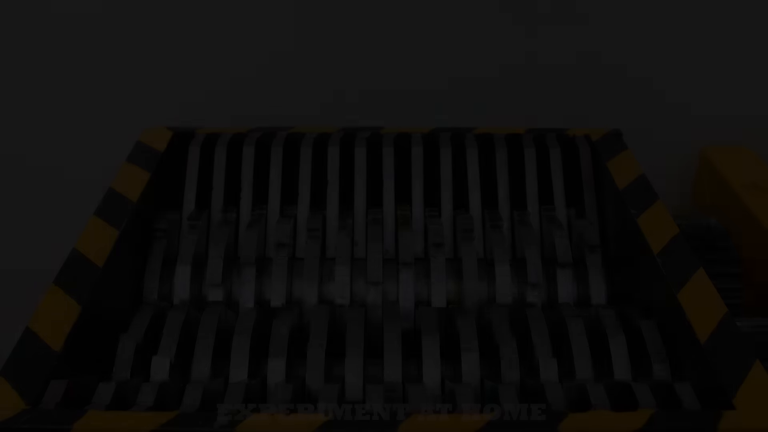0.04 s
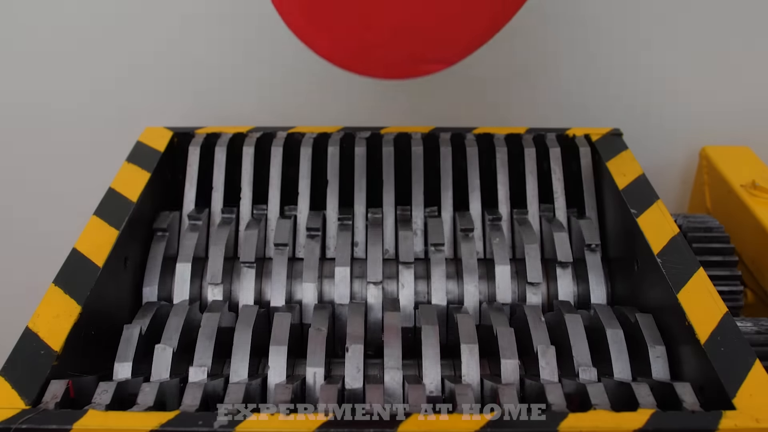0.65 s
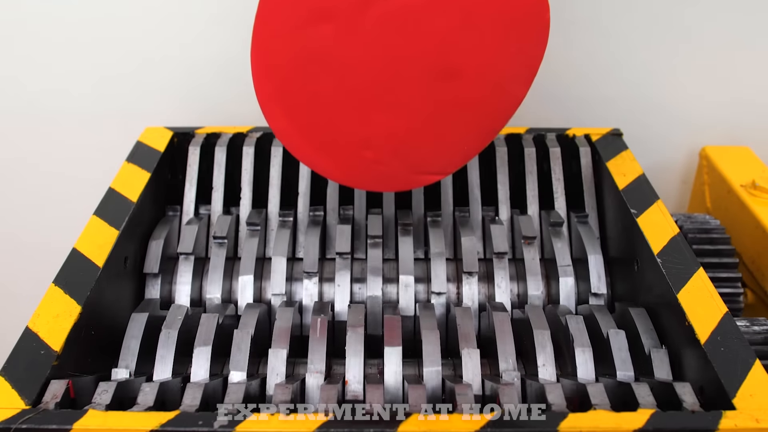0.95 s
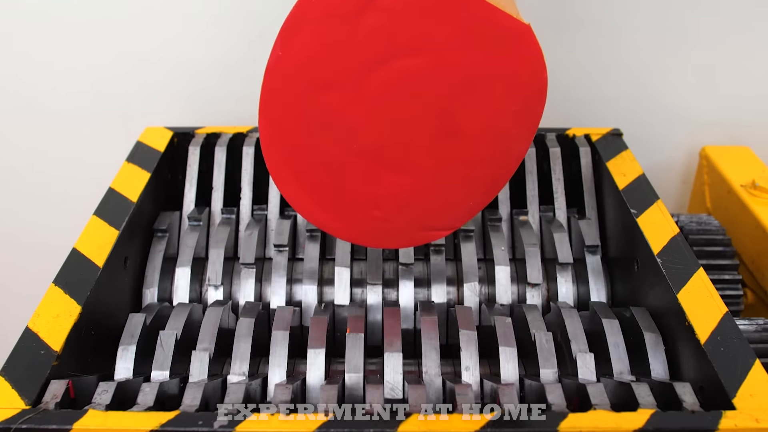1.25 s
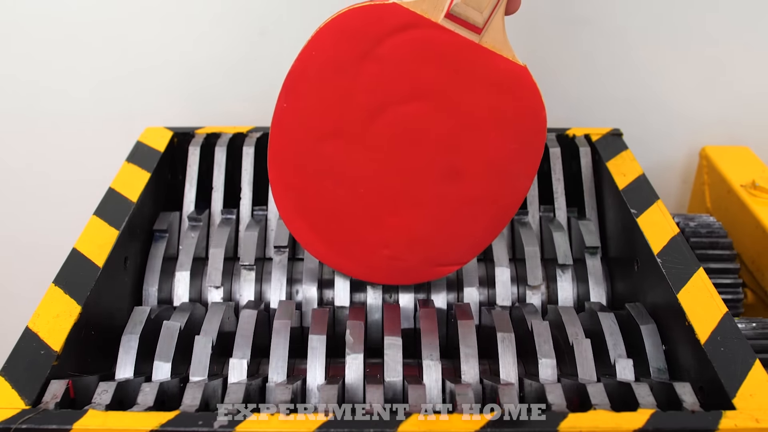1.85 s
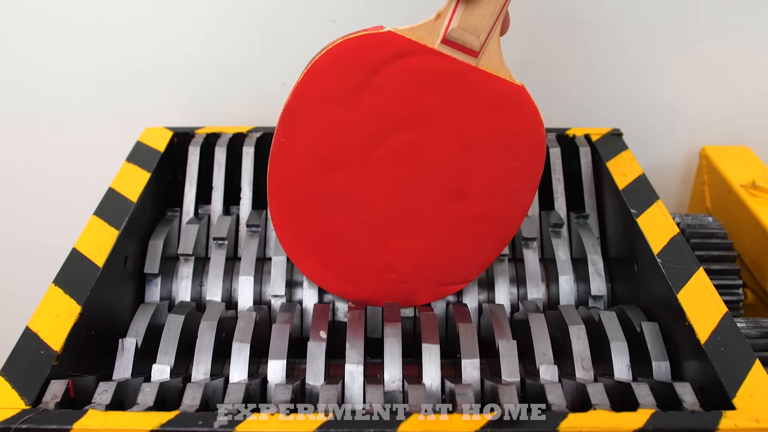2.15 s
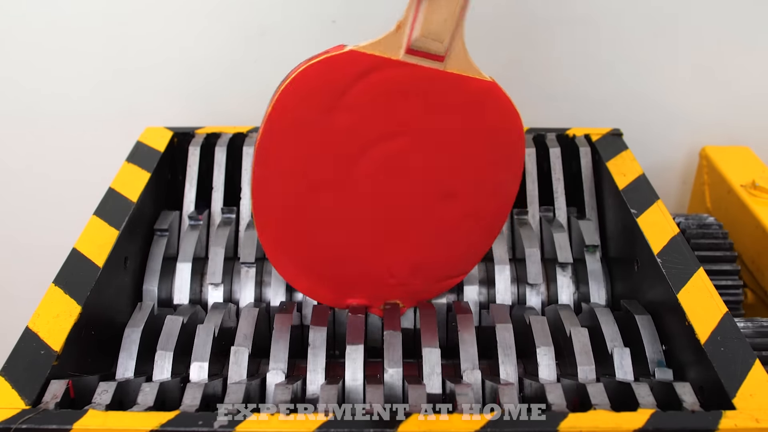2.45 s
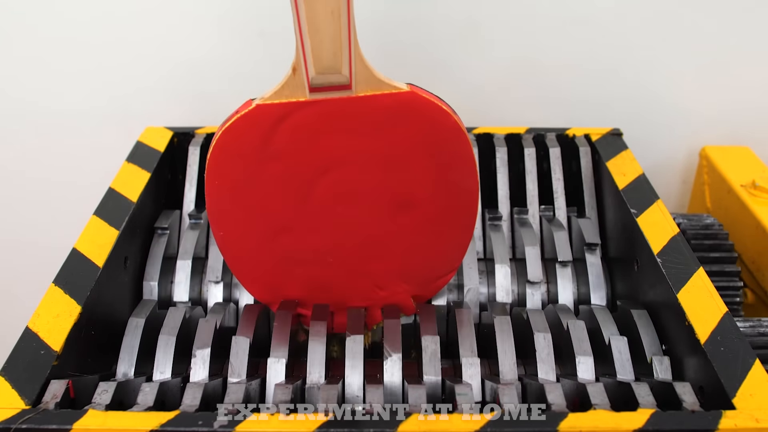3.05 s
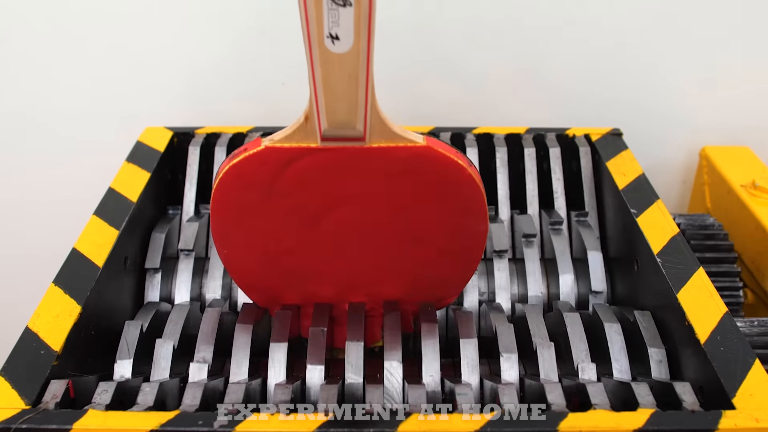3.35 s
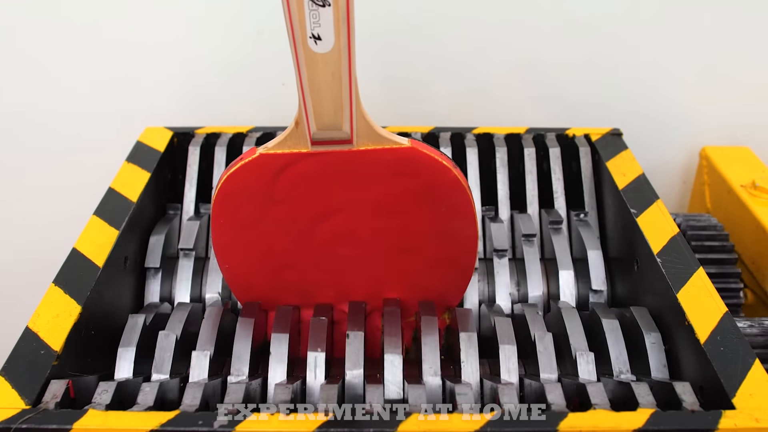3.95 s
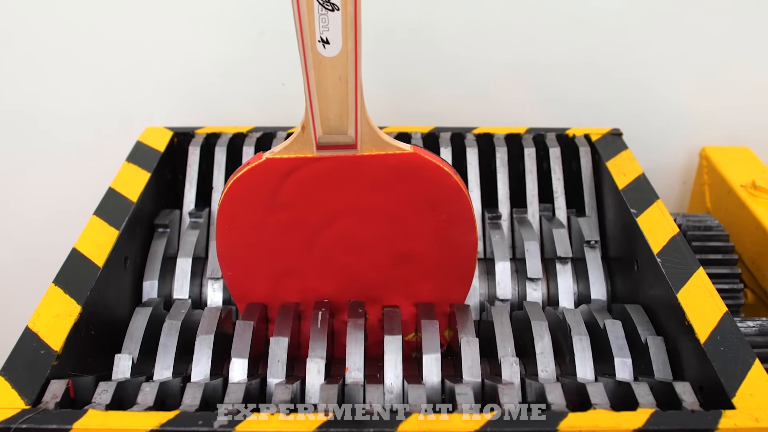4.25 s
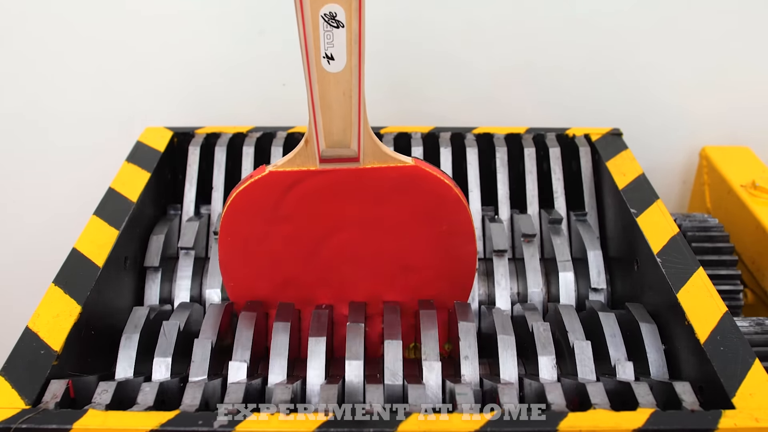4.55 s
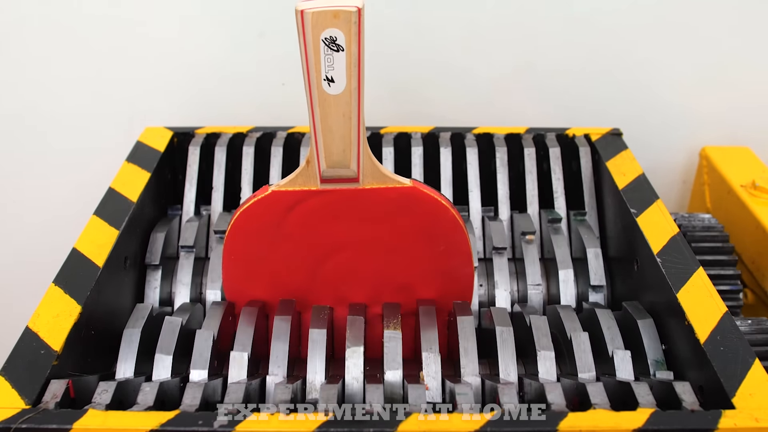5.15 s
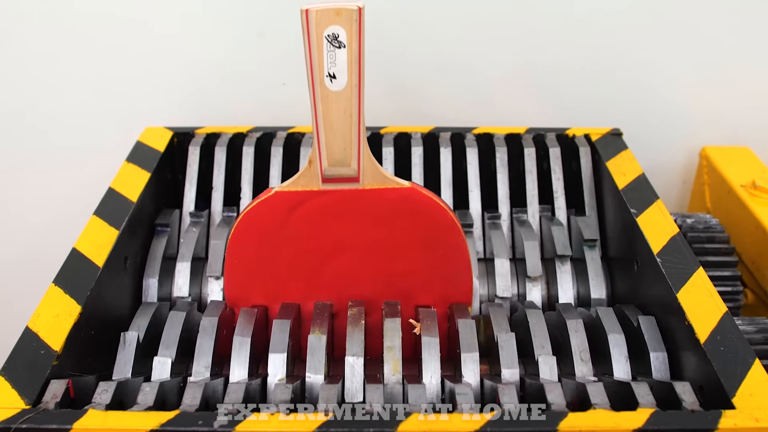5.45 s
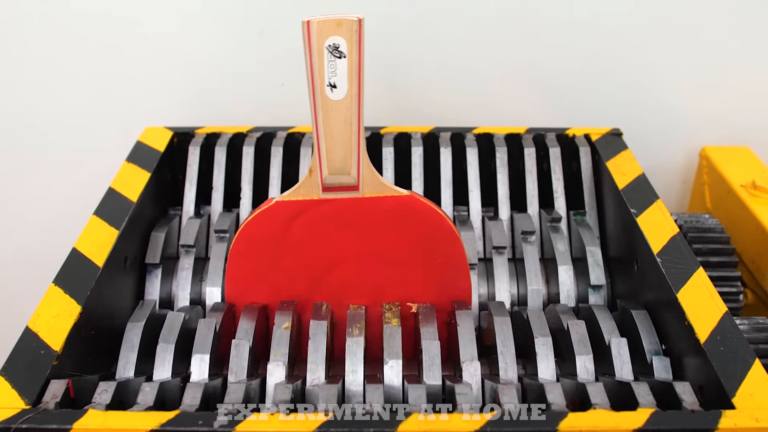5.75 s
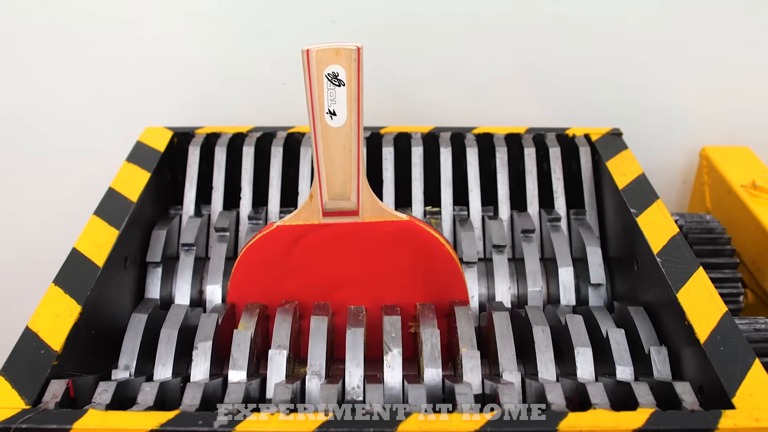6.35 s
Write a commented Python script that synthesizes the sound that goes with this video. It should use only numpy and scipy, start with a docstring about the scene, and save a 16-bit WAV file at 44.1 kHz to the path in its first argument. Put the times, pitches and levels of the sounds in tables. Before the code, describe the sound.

An idling shredder whines and knocks softly, then rumbles as it steadily crushes, snaps and splinters a plywood paddle.

```python
"""A twin-shaft shredder fades in, idling: gears and mains hum, bearings whine, the coupling knocks.
From 2.5 s its hooks catch a plywood table-tennis paddle; the motor sags and the frame rumbles.
Nine hooks a second then crush the fibres, the plies snap with sharp cracks and the paddle jolts the frame.
Towards the end the paddle's own ring climbs as it is eaten shorter."""
import sys
import numpy as np
from scipy import signal
from scipy.fft import rfft, irfft, next_fast_len
from scipy.io import wavfile
from scipy.ndimage import map_coordinates

SR = 44100
rng = np.random.default_rng(int(sys.argv[2]) if len(sys.argv) > 2 else 0)


def master_out(mix):
    """Clip the mix to full scale and print it as 16-bit PCM to the path in sys.argv[1]."""
    frames = np.transpose(np.atleast_2d(mix))
    ceiling = np.clip(frames, -1, 1)
    pcm = np.round(ceiling * 32767).astype(np.int16)
    wavfile.write(sys.argv[1], SR, pcm)


N = 344421
TIME_S = np.arange(N) / SR

# first hook ticks, then ply snaps: time_s, relative_db, treble_db, ring_re_snap_db, tear_re_click_db
PLY_SNAPS = [(2.631, -41, -24, 3, 3), (2.685, -39, -11, 12.5, 6), (2.695, -15, -6, -12.5, 3),
             (2.7189, -21, -9, -12, -1), (2.7426, -22.5, 1, -26, -1), (2.7817, -28, -7, -18, -5),
             (2.8245, -19.5, 3, -6, -3), (2.8344, -12.5, -20, -17, -4), (2.848, -21.5, -1, -21, -10),
             (3.0447, -18, -1, -24, 0), (3.0737, -13.5, -20, -31, -14), (3.081, -18.5, 1, -12, 6),
             (3.1208, -13.5, -11, -14, 5), (3.1706, -24, -11, -18, -3), (3.2096, -21.5, 3, -24, -4),
             (3.2274, -16, -17, -5, -1), (3.3424, -21, -5, -9, 2), (3.386, -23, -9, -8.5, -11),
             (3.4225, -22, -16, -19, -2), (3.437, -32, -15, -20, 0), (3.462, -17.5, -17, -31, 0),
             (3.6016, -13.5, -2, -28, 5), (3.6144, -20, 2, -21, -11), (3.7221, -17, -5.5, -29, -1),
             (3.849, -19.5, -3, -28, -2), (3.9027, -25.5, -24, -25, -8), (3.9258, -21, -13, -25, -16),
             (4.012, -17.5, 1, -23, -14), (4.0828, -18.5, -2, -25, -1), (4.1457, -29, -17, -28, 5),
             (4.2032, -20, -16, -21, 4), (4.327, -21.5, 4, -10, -8), (4.356, -20, -10, -27, 2),
             (4.4687, -27.5, -11, -6, -1), (4.641, -20, -4, -6.5, 15), (4.7228, -21, 1, -20, 2),
             (4.8155, -22, 9, -17, 3), (4.8325, -20, -1, -28, -1), (4.871, -19, 1, -19, 20),
             (4.9647, -20, -8, -10, 5), (5.0583, -15, -5, -14, -1), (5.0683, -12.5, -7, -32, 8),
             (5.087, -25, -20, -16, -9), (5.179, -15.5, -27, -8.5, 2), (5.2766, -24, -7, 3.5, 8),
             (5.296, -19, -7, -4.5, 15), (5.3004, -22, -18, -2.5, 10), (5.3713, -24.5, -15, -17, -5),
             (5.401, -14, -6, -11, -2), (5.5102, -23, -2, -5, 13), (5.5212, -28.5, -3, 2.5, 14),
             (5.6047, -29.5, -23, 4.5, 17), (5.7106, -23.5, -9, -7.5, 8), (5.8533, -23, -9, -2, 5),
             (5.8718, -23, 0, -4, -1), (5.9525, -19.0, 3, -9.5, 1), (5.9757, -20.5, 1, -6, 13),
             (6.0237, -26, -1, -8, 3), (6.072, -20.5, 1, -1.5, 8), (6.1534, -19.5, -22, -11, 0),
             (6.178, -21.5, -13, -5.5, -1), (6.232, -22, -8, -2.5, 11), (6.2463, -22.5, -26, -3.5, 7),
             (6.4944, -19.0, 0, -9, 19), (6.516, -26, 0, -5, 3), (6.6212, -21, 7.5, -7, 0),
             (6.635, -18, -11, -10.5, 7), (6.655, -19, -3, -21, -4), (6.6862, -25.5, -9, -22, 8),
             (6.7839, -19, -6, -6.5, 2), (7.0305, -14, -18, -7, -5), (7.0473, -21.5, 10, -23, 1),
             (7.0634, -23, -10, -12, 8), (7.1807, -19, -1.5, -28, 6), (7.2554, -18.5, 7, -24, 6),
             (7.2746, -19.5, -7, -9.5, 0), (7.289, -24, 6, -25, -9), (7.3066, -15.5, -3, -28, 3),
             (7.3273, -17.5, -5, -11, 9), (7.3458, -14, -8, -32, -3), (7.4337, -19.5, 5, -14, 3),
             (7.5828, -15.5, -9.5, -20.5, -1), (7.653, -21, -3.5, -27, -7), (7.676, -18.5, -8, -27, 7),
             (7.7198, -21.5, -1, 2, 0), (7.7517, -20, -26, -19, 14), (7.7677, -19.0, 3, -18, 14)]
# resistance of the wood: time_s, load_fraction
WOOD_LOAD = [(2.45, 0.039), (2.56, 0.35), (2.67, 0.45), (2.76, 0.95), (2.97, 0.76), (3.25, 0.83),
             (3.4, 0.92), (4.1, 0.93), (5.6, 0.97), (7.81, 0.95)]
# paddle drawn in by fits and starts: time_s, feed_fraction
PADDLE_FEED = [(3.24, 0.06), (3.5, 0.24), (4.2, 0.43), (5.05, 0.56), (5.18, 0.69), (5.56, 0.71), (5.8, 0.8),
               (6.4, 0.81), (6.8, 0.88), (7.3, 0.95)]


def crushing():
    """Each hook swells the crunch over a steady grind. Returns sound and force on the paddle."""
    # whole strips caving in: centre_s, level_db, duration_s
    collapses = [(2.832, -22, 0.028), (3.608, -17.5, 0.0096), (4.03, -26.5, 0.092), (4.19, -26, 0.043),
                 (4.33, -27.5, 0.077)]
    # fine splintering: frequency_hz, density_db
    fine_spectrum = [(200, -15), (700, 1.5), (1500, -7.5), (2400, 3), (3000, -1.5), (3700, 0.5),
                     (5400, 1.5), (6900, 0), (8400, 1), (9200, -1.5), (10200, -16), (13400, -5),
                     (15800, -32)]
    # thicker splinters: frequency_hz, density_db
    thick_spectrum = [(500, -3), (2000, 0), (5000, -14.5), (8500, 9.5), (10500, -6.5), (15800, -12.5)]
    load = curves(WOOD_LOAD)[0]
    bite_power = hook_bites(load, first_s=2.70, period_s=0.1086, jitter_s=0.008)
    grind_power = (load ** 2 * amp(-31)) ** 2
    grip = slack(depth=7.2, recover_s=0.043)
    crunch_power = grip ** 2 * (grind_power + bite_power) + swells(collapses)
    force_power = (load * amp(-38.5)) ** 2 + amp(-11) ** 2 * bite_power
    fine = fibres(rate_hz=2200, scatter_db=7, echo_gain=1.4, echo_s=0.0033, shift_db=2, spots=16)
    thick = fibres(rate_hz=50, scatter_db=3, echo_gain=2, echo_s=0.001, shift_db=1.5, spots=8)
    crunch = unit(colour(fine, fine_spectrum)) + amp(-4) * unit(colour(thick, thick_spectrum))
    crunch += amp(-5) * chips(rate_hz=51, centre_hz=4480, log_spread=0.34, decay_s=0.0013)
    return np.sqrt(crunch_power) * unit(crunch), np.sqrt(force_power) * unit(fine + amp(-1.5) * thick)


def hook_bites(load, first_s, period_s, jitter_s):
    """Power of hook after hook meeting the wood; bites get crisper as the paddle goes deeper."""
    hooks_s = np.arange(first_s, N / SR, period_s)
    lateness, size = rng.standard_normal((len(hooks_s), 2)).T
    feed = np.interp(hooks_s, *np.transpose(PADDLE_FEED))
    durations_s = np.interp(feed, [0, 1], [0.08, 0.048])
    return load ** 5.9 * swells(zip(hooks_s + jitter_s * lateness, -27.5 + 0.64 * size, durations_s))


def slack(depth, recover_s):
    """Crunch gain: a big snap frees the wood until the hooks grip again."""
    relief, t = np.zeros(N), np.arange(SR // 3) / SR
    for time_s, snap_db, *_ in PLY_SNAPS:
        add(relief, time_s, amp(snap_db) ** 2 * t / recover_s * np.exp(1 - t / recover_s))
    return 1 / (1 + depth * relief)


def fibres(rate_hz, scatter_db, echo_gain, echo_s, shift_db, spots):
    """Fibres of unequal size break; the work shifts between spots, each with its own short echo."""
    track, t = np.zeros(N), np.arange(SR // 100) / SR
    for _ in range(spots):
        breaks = rng.random(N) < rate_hz / spots / SR
        sizes = amp(scatter_db * np.clip(rng.standard_normal(N), -2, 2)) * rng.choice([-1, 1], N)
        echo = echo_gain * unit(rng.standard_normal(len(t)) * np.exp(-t / echo_s)) / np.sqrt(len(t))
        echo[0] += 1
        work = amp(shift_db * np.tanh(wobble(14)))
        track += signal.oaconvolve(breaks * sizes * work, echo)[:N]
    return unit(track)


def chips(rate_hz, centre_hz, log_spread, decay_s):
    """Small chips snap off, each with a tick and a brief ring at its own pitch."""
    track, t = np.zeros(N), np.arange(SR // 125) / SR
    for place, pitch, size in rng.random((round(rate_hz * N / SR), 3)):
        ring_hz = centre_hz * np.exp(log_spread * (2 * pitch - 1))
        ring = np.sin(2 * np.pi * ring_hz * t) * np.exp(-t / decay_s)
        tick = 1.05 * rng.standard_normal(len(t)) * np.exp(-2 * t / decay_s)
        add(track, place * N / SR, amp(10 * size) * (ring + tick))
    return unit(track)


def snapping(click_s, base_tear_s, tear_rise_s, lead_gain, lead_s, grain_db):
    """A few fibres give, then a ply clicks and tears on. Returns sound and force on the paddle."""
    # freed slivers ringing near a common pitch: time_s, pitch_hz, relative_db
    slivers = [(3.1, 4840, -10.5), (6.5, 4500, -18), (7.03, 4480, -10), (7.25, 5520, -5)]
    sliver_hz, sliver_db = curves(slivers)
    cracks, force = np.zeros(N), np.zeros(N)
    t = np.arange(-SR // 100, SR // 50) / SR
    burst_gain = np.sqrt(0.006 * SR / len(t))  # energy of 6 ms at unit RMS
    # the wood smears the click: highs arrive first
    remaining = np.clip(1 - t / click_s, 0, 1) * (t > 0)
    click = unit(np.sin(np.pi * 16000 * click_s * remaining ** 2))
    for time_s, snap_db, treble_db, ring_db, tear_db in PLY_SNAPS:
        tear_s = base_tear_s * amp(tear_db / 2)  # bigger tears last longer
        tearing = (1 - np.exp(-abs(t) / tear_rise_s)) * np.exp(-abs(t) / tear_s)
        giving = lead_gain * np.exp(-abs(t) / lead_s)
        strands = rng.standard_normal(len(t))
        strands *= amp(grain_db * np.repeat(rng.standard_normal(len(t)), 8)[:len(t)])
        tear = amp(tear_db) * unit(strands * np.where(t < 0, giving, tearing))
        burst = unit(click + tear)
        now = round(time_s * SR)
        pitch_hz = np.full(len(t), sliver_hz[now] * np.exp(0.02 * rng.standard_normal()))
        sliver = 0.5 * amp(sliver_db[now]) * resonate(burst, pitch_hz, width_hz=400)
        spectrum = [(300, -21), (800, -12), (1500, -1), (2400, 1), (3000, -0.5), (4000, 2.5), (5500, 1),
                    (8400, treble_db / 2 + 7.5), (10000, treble_db), (16000, treble_db - 3)]
        crack = unit(colour(burst + sliver, spectrum))
        add(cracks, time_s + t[0], amp(snap_db - 0.06) * burst_gain * crack)
        add(force, time_s + t[0], amp(snap_db + ring_db + 2) * burst_gain * unit(click + 0.5 * tear))
    return cracks, force


def paddle(force, damping, slip):
    """The blade's bending modes climb as it gets shorter and shift with the grip."""
    # modes, loudest as the hooks pass an antinode:
    # antinode_feed, antinode_hz, climb_hz_per_feed, peak_db, rise_db_per_feed, fall_db_per_feed
    bending_modes = [(0.06, 1670, 1350, 2, 12, 11), (0.78, 1705, 1590, 6, 9, 100),
                     (0.95, 1265, 4000, 0, 70, 20), (0.82, 540, 2000, 1, 38, 70),
                     (0.95, 5480, 520, -1, 44, 10)]
    # bass cut that keeps the ring light and free of thumps: frequency_hz, gain_db
    bass_cut = [(250, -25.5), (500, -9.5), (1100, -0.5), (4000, -6.5)]
    ring, feed = np.zeros(N), curves(PADDLE_FEED)[0]
    force = colour(force, bass_cut)
    for antinode, antinode_hz, climb, peak_db, rise, fall in bending_modes:
        past = feed - antinode
        pitch_hz = np.maximum(antinode_hz + climb * past, 200) * (1 + slip * wobble(45))
        gain = amp(peak_db + np.minimum(rise * past, -fall * past))
        ring += gain * resonate(force, pitch_hz, width_hz=damping * antinode_hz)
    return ring


def jolts(decay_s, rise_s):
    """Dull knocks in the frame as the paddle jumps between the hooks."""
    # paddle jumps: time_s, relative_db
    jumps = [(3.528, -32), (3.795, -33.5), (4.243, -29), (4.578, -32), (5.561, -29), (5.72, -30.5),
             (5.927, -33.5), (6.416, -33.5), (7.205, -28)]
    spectrum = [(60, -22), (150, -27), (200, -14.5), (275, 6.5), (370, -10), (750, -9.5), (4000, -72)]
    knocks, t = np.zeros(N), np.arange(SR // 5) / SR
    envelope = (1 - np.exp(-t / rise_s)) * np.exp(-t / decay_s)
    for time_s, relative_db in jumps:
        body = unit(colour(rng.standard_normal(len(t)), spectrum))
        add(knocks, time_s - rise_s, amp(relative_db + 7.5) * body * envelope)
    return knocks


def drive(mains_hz):
    """The motor and all it shakes; under load the shaft sags and runs less evenly."""
    # motor shaft: time_s, speed_hz
    shaft_speed = [(0, 24.86), (2.55, 24.86), (2.76, 24.5), (3.05, 24.78), (3.4, 24.54), (4.1, 24.63),
                   (5.1, 24.48), (5.6, 24.35), (6.9, 24.42), (7.81, 24.25)]
    load = curves(WOOD_LOAD)[0]
    shaft_hz = curves(shaft_speed)[0] * (1 + (0.0002 + 0.00386 * load) * wobble(16))
    shaft_rad = 2 * np.pi * np.cumsum(shaft_hz) / SR
    mains_rad = 2 * np.pi * mains_hz * TIME_S
    return (gear_train(shaft_rad, shaft_hz, load, teeth=38) + magnetic_hum(mains_rad, load)
            + frame(shaft_rad, mains_rad, load) + fan(level_db=-44)
            + coupling(shaft_rad, load, ring_hz=280.8, width_hz=20.7))


def gear_train(shaft_rad, shaft_hz, load, teeth):
    """Load roughens the gear tones, lowers the whine and makes the teeth growl at the mesh frequency."""
    # shaft and gear tones: shaft_multiple, unloaded_db
    gear_orders = [(5, -56), (26, -62), (29, -54), (30, -53), (33, -53.5), (34, -52.5), (37, -52.5),
                   (38, -47), (39, -51.5), (42, -45), (43, -58), (50, -57)]
    # rotor slots and bearings: shaft_multiple, relative_db
    whine_orders = [(72, -57), (80, -54.5), (81, -61), (91.2, -53.5), (95.6, -53.5), (100, -54),
                    (105.8, -43), (107, -55), (110, -57)]
    gears = amp(load * (3 + 1.65 * wobble(22))) * tones(gear_orders, shaft_rad)
    whine = amp(2 - 6.7 * np.sqrt(load)) * tones(whine_orders, shaft_rad)
    growl = unit(resonate(rng.standard_normal(N), teeth * shaft_hz, width_hz=16))
    return gears + whine + amp(-39.5) * load ** 2 * growl


def magnetic_hum(mains_rad, load):
    """The motor hums at even multiples of the mains, weaker under load."""
    # overtones: mains_multiple, unloaded_db
    harmonics = [(4, -54.5), (6, -44), (8, -52)]
    # low 100 Hz hum swelling and fading: time_s, unloaded_db
    low_hum_levels = [(.6, -50), (1.4, -50.5), (1.95, -44), (2.5, -50.5), (2.9, -43)]
    overtones = sum(np.sqrt(2) * amp(db) * np.cos(multiple * mains_rad) for multiple, db in harmonics)
    low_hum = amp(curves(low_hum_levels)[0]) * unit(np.sin(2 * mains_rad))
    return amp(-6 * load) * (overtones + low_hum)


def frame(shaft_rad, mains_rad, load):
    """The casing buzzes with each magnetic pull and each turn; the loaded frame throbs and rumbles."""
    # throb, twice a turn: time_s, full_load_db
    throb_levels = [(3.4, -49), (6.6, -55), (7.5, -54)]
    # casing buzz: frequency_hz, density_db
    buzz_spectrum = [(25, -4), (80, -11.5), (150, -1), (180, -10.5), (230, 3), (290, -2.5), (480, -7),
                     (800, -1.5), (1150, -7.5), (1330, -2), (1700, -12), (2400, -0.5), (2650, -4),
                     (3000, -31), (4000, -33)]
    # frame rumble: frequency_hz, density_db
    rumble_spectrum = [(25, -3.5), (50, -4), (72, -5.5), (110, -11.5), (150, 6.5), (185, -7), (270, 7),
                       (350, 0.5), (460, -5), (730, -3), (930, -6), (1200, -4), (2500, -21), (5000, -16)]
    throb = load * amp(curves(throb_levels)[0] + 1.4 * wobble(12)) * unit(np.sin(2 * shaft_rad))
    buzz = amp(-42.5 + 1.4 * np.sin(2 * mains_rad) + 1.6 * np.cos(shaft_rad)) * noise(buzz_spectrum)
    rumble = load * amp(-34.5 + 2.2 * wobble(18)) * noise(rumble_spectrum)
    return throb + buzz + rumble


def coupling(shaft_rad, load, ring_hz, width_hz):
    """Play in the coupling knocks once a turn and rings the casing, more unevenly under load."""
    # knocking: time_s, level_db
    knock_levels = [(.5, -55), (.85, -42.5), (1.25, -42), (1.5, -50.5), (2.6, -41), (3.5, -41)]
    knocks = np.diff(np.floor(shaft_rad / (2 * np.pi) + 0.5), prepend=0)
    force = knocks * amp((1 + 3 * load) * np.tanh(wobble(27)))
    return amp(curves(knock_levels)[0]) * unit(resonate(force, np.full(N, ring_hz), width_hz))


def fan(level_db):
    """Steady hiss of air."""
    # fan air: frequency_hz, density_db
    air_spectrum = [(1500, -8), (3000, 4), (4100, 5.5), (4400, 7), (5400, 2), (6500, 6), (7300, 3.5),
                    (8800, 7), (9400, -2), (10200, -2.5), (12000, -13.5), (14000, -8), (16000, -59)]
    return amp(level_db) * noise(air_spectrum)


def room(x, t60_s):
    """Short diffuse tail from the hopper and walls."""
    t = np.arange(SR // 3) / SR
    tail = rng.standard_normal(len(t)) * amp(-60 * t / t60_s) * (t > 0.003)
    return signal.fftconvolve(x, tail / np.linalg.norm(tail))[:N]


def amp(db):
    return 10 ** (np.asarray(db) / 20)


def unit(x):
    return x / np.sqrt(np.mean(x ** 2) + 1e-20)


def curves(rows):
    """One value per sample for each column after time_s."""
    times_s, *columns = np.transpose(rows)
    return [np.interp(TIME_S, times_s, column) for column in columns]


def wobble(rate_hz):
    """Smooth random curve through rate_hz knots a second."""
    knots = rng.standard_normal(int(N * rate_hz / SR) + 4)
    return np.interp(TIME_S, TIME_S[::32], map_coordinates(knots, [TIME_S[::32] * rate_hz]))


def swells(rows):
    """Summed power of bell-shaped swells."""
    power, t = np.zeros(N), np.arange(-SR // 8, SR // 8) / SR
    for centre_s, level_db, duration_s in rows:
        add(power, centre_s + t[0], amp(level_db) ** 2 * np.exp(-(2 * t / duration_s) ** 2))
    return power


def colour(x, spectrum):
    """Minimum-phase filter through rows of frequency_hz, gain_db."""
    size = 2048
    hz, db = np.transpose(spectrum)
    gain_db = np.interp(np.log(np.fft.rfftfreq(size, 1 / SR) + 1), np.log(hz), db)
    cepstrum = irfft(np.log(amp(gain_db)))
    cepstrum[1:size // 2] *= 2
    cepstrum[size // 2 + 1:] = 0
    return signal.fftconvolve(x, irfft(np.exp(rfft(cepstrum))))[:len(x)]


def noise(spectrum):
    return unit(colour(rng.standard_normal(N), spectrum))


def resonate(x, centre_hz, width_hz):
    """Resonance with a moving centre; white noise keeps its level."""
    turn = np.exp(2j * np.pi * np.cumsum(centre_hz) / SR)
    pole = np.exp(-np.pi * width_hz / SR)
    return np.real(turn * signal.lfilter([np.sqrt(2 * (1 - pole ** 2))], [1, -pole], x / turn))


def tones(orders, angle_rad):
    """Sines at multiples of a turning angle, in random phase."""
    return sum(np.sqrt(2) * amp(db) * np.sin(multiple * angle_rad + rng.uniform(0, 2 * np.pi))
               for multiple, db in orders)


def add(track, start_s, sound):
    part = track[round(start_s * SR):][:len(sound)]
    part += sound[:len(part)]


def scene():
    """Wood, drive and frame, close up in a small room; mono."""
    crunch, crush_force = crushing()
    cracks, snap_force = snapping(click_s=0.000428, base_tear_s=0.00092, tear_rise_s=0.0012,
                                  lead_gain=0.14, lead_s=0.0027, grain_db=3.5)
    wood = crunch + cracks + paddle(crush_force + snap_force, damping=0.12, slip=0.022)
    machine = drive(mains_hz=50) + jolts(decay_s=0.026, rise_s=0.00452)
    return (wood + machine + amp(-11.5) * room(wood, t60_s=0.035))[None]


def record(dry):
    """One-second fade-in, clipping at full scale, 16 kHz band limit."""
    fade = np.sin(np.pi / 2 * np.clip((TIME_S - 0.013) / 1.01, 0, 1))
    clipped = np.clip(dry * fade, -1, 1)
    size = next_fast_len(N + SR // 4)
    passband = np.fft.rfftfreq(size, 1 / SR) < 16000
    return irfft(rfft(clipped, size) * passband, size)[:, :N]


dry = scene()
out = record(dry)
master_out(out)
```